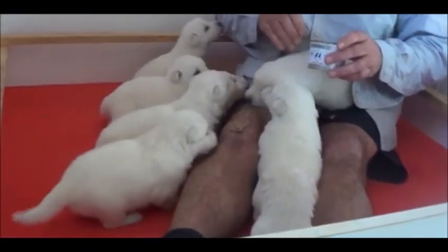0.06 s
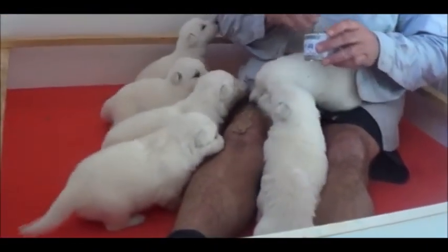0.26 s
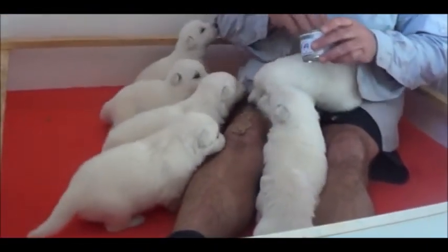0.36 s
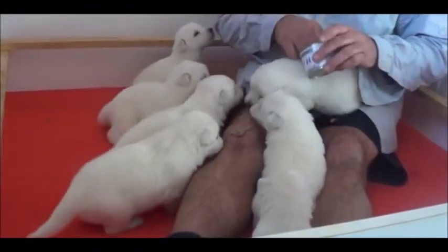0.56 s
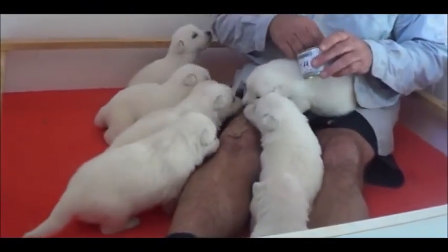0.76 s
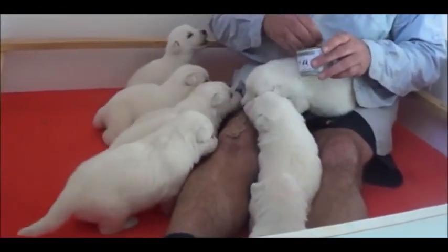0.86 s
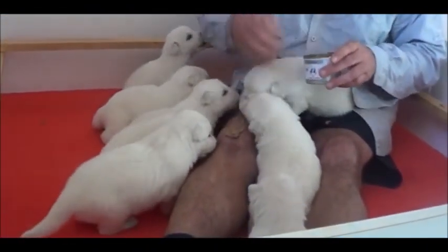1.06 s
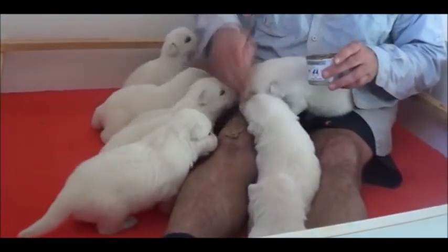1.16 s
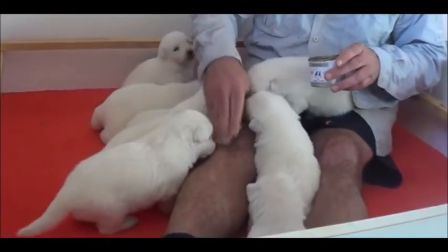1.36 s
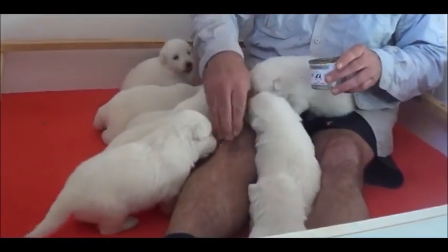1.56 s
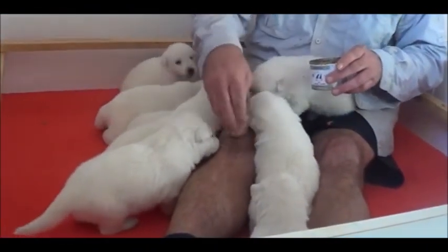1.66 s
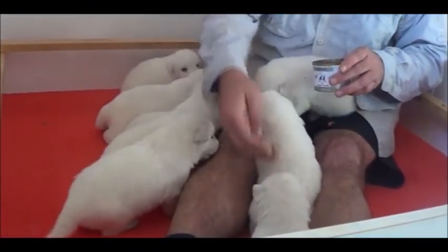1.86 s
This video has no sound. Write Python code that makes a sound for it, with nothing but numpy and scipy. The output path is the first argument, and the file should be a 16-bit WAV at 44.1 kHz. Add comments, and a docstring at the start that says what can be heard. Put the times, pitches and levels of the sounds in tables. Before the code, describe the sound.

Puppies give four high whines and a few short yips in a small room.

```python
"""Puppies beg for food in a small, bare room: four high arched whines, three short, lower yips.
Their vocal folds give near-pure tones; in the whines, overtones and air pass through the throat.
Between them: two soft grunts, fur rustling on cloth, mouth and claw clicks, faint squeaks.
The room rings after every cry, over a quiet hiss and a thin electrical whistle."""
import sys
import numpy as np
from scipy import signal
from scipy.fft import rfft, irfft
from scipy.io import wavfile
from scipy.ndimage import uniform_filter1d

SR = 44100
rng = np.random.default_rng(int(sys.argv[2]) if len(sys.argv) > 2 else 0)


def waveform_to_disk(signal):
    """Save audio, clipped to [-1, 1], as 16-bit WAV at the path in sys.argv[1]."""
    frames = np.transpose(np.atleast_2d(signal))
    scaled = np.clip(frames, -1, 1) * 32767
    samples = np.round(scaled).astype(np.int16)
    wavfile.write(sys.argv[1], SR, samples)


N = 83790

# hiss level: t/s, level/dB
HISS_ENVELOPE = [(0, -45.5), (.75, -46.5), (1.15, -43), (1.45, -43), (1.9, -44.5)]
# hiss spectrum: f/Hz, relative density/dB
HISS_SPECTRUM = [(20, -21), (45, -12), (70, -5.5), (100, -2), (150, -5), (280, -6), (560, -8), (850, 1),
                 (1240, -12), (2060, -4.5), (3500, -9), (4500, -4), (5200, -10), (6300, -8.5),
                 (9800, -18.5), (15500, -21.5)]
# yips: start/s, length/s, top pitch/Hz, share of length before top, fractional pitch fall, level/dB
YIP_EVENTS = [(0.013, .028, 996.6, 0.075, 0.223, -32), (1.553, 0.061, 906.2, 0.42, .22, -31.5),
              (1.825, 0.034, 875, 0.44, 0.258, -33.5)]
# room decay: f/Hz, T60/s
ROOM_DECAY = [(200, .5), (1000, 0.49), (2400, 0.47), (5000, 0.4), (12000, 0.23)]
# room response: f/Hz, gain/dB
ROOM_GAIN = [(200, -8), (1000, 3), (2400, -2.5), (5000, -8.5), (12000, 8)]
# stereo width of hiss, room, rustles and clicks: f/Hz, left-right likeness (1 = mono)
STEREO_LIKENESS = [(100, 0.99), (500, 0.46), (1000, 0.63), (2500, 0.12), (5000, 0.21), (8000, 0.66),
                   (13000, 0.99)]
# clicks: start/s, level before envelope/dB, centre/Hz, width/octaves
CLICK_EVENTS = [(0.065, -38, 2200, 1.6), (0.126, -38, 3000, 3.8), (0.334, -32, 4430, 0.41),
                (.478, -38, 2500, 1.2), (0.568, -36.5, 9000, .5), (.598, -26.5, 4400, 0.68),
                (0.737, -37.5, 616, 0.79), (1.017, -42, 11600, 0.032), (1.04, -30.5, 4300, 0.5),
                (1.421, -42.5, 9100, .5), (1.554, -38.5, 7400, 0.4), (1.611, -39, 11870, 0.018),
                (1.67, -41, 3940, 0.19), (1.755, -40.5, 7300, .5), (1.867, -41.5, 11600, 0.02)]
# one contour per whine: t/s, pitch/Hz, fundamental/dB, even overtone drive/dB, odd overtone drive/dB
WHINE_CONTOURS = [
    [(.213, 1044, -45, -44, -42.5), (.24, 1032, -24.5, -34.5, -42.5), (.255, 1080, -36, -29, -27.5),
     (.268, 1137, -24, -56, -26), (.285, 1107, -25, -29, -52), (.305, 1012, -28.5, -42, -52)],
    [(.476, 1030, -29, -41, -53), (.498, 1042, -36, -30, -36.5), (.52, 1137, -30.5, -25.5, -25),
     (.538, 1234, -22, -34.5, -18), (.556, 1238, -20.5, -26, -39), (.578, 1134, -27.5, -32.5, -46),
     (.61, 1067, -26.5, -38, -43)],
    [(.786, 1074, -57, -45, -45), (.803, 1046, -35, -43, -44), (.826, 1149, -27, -33.5, -24),
     (.848, 1205, -32.5, -37, -21), (.86, 1208, -27.5, -19.5, -19), (.89, 1220, -34, -14, -25.5),
     (.914, 1212, -26.5, -15, -24.5), (.932, 1142, -25.5, -23, -33.5), (.962, 1113, -30, -27.5, -25.5),
     (.99, 1033, -28.5, -38, -45)],
    [(1.176, 1013, -43.5, -42.5, -46), (1.205, 989.4, -31.5, -37.5, -39), (1.23, 1003, -25.5, -38.5, -41),
     (1.262, 1009, -22, -35, -30.5), (1.28, 926, -22.5, -32.5, -33.5), (1.297, 811.4, -31.5, -34.5, -50),
     (1.33, 852, -27.5, -60, -50)],
]
# aim of each whine: tilt/dB per harmonic, left over right/dB, direct gain/dB
WHINE_AIMS = [(0.05, 8, -2), (0.87, 11, -6.5), (0.1, 3.5, 0.5), (-0.08, 5.5, -3)]
# throat response: f/Hz, gain/dB
THROAT_GAIN = [(500, -44), (1600, -9), (2100, -5), (2420, -3), (3000, -9), (3550, -3), (4020, 1.5),
               (4350, -10), (4870, -2.5), (5200, -5.5), (5600, 0.5), (6200, -6.5), (7300, -20.5),
               (8500, -31), (9700, -33.5), (14000, -54)]
# rustles: start/s, length/s, brush level/dB, rub level/dB
RUSTLE_EVENTS = [(0.287, 0.056, -34.5, -42.5), (0.559, 0.066, -37, -50.5), (0.654, .1, -55.5, -51),
                 (0.982, 0.094, -40.5, -48), (1.262, 0.075, -45, -59)]
# bright brush of fur: f/Hz, relative level/dB
BRUSH_SPECTRUM = [(500, 8), (1500, 9), (3000, 11.5), (5000, 17.5), (7000, 3.5), (10000, -1.5), (15000, -31)]
# low rub of fur: f/Hz, relative level/dB
RUB_SPECTRUM = [(30, -26), (120, -12), (280, 13.5), (600, 3.5), (1500, 6.5), (5000, -46)]
# grunts: start/s, length/s, first pitch/Hz, last pitch/Hz, level/dB, tilt/dB per harmonic
GRUNT_EVENTS = [(0.452, 0.033, 206, 173.6, -35.5, -6.5), (.99, 0.1057, 183.1, 239.5, -36, -19)]
# squeaks: start/s, length/s, level/dB
SQUEAK_EVENTS = [(1.327, 0.11, -57), (1.5, 0.1, -60), (1.737, 0.084, -58.5)]


def amp(db):
    return 10 ** (np.asarray(db) / 20)


def unit_rms(x):
    return x / np.sqrt(np.mean(x ** 2) + 1e-20)


def log_interp(points, hz):
    table_hz, value = np.transpose(points)
    return np.interp(np.log(hz + 1), np.log(table_hz + 1), value)


def add(mix, start_s, sound):
    part = mix[..., max(round(start_s * SR), 0):][..., :sound.shape[-1]]
    part += sound[..., :part.shape[-1]]


def bins_hz(size):
    return np.fft.rfftfreq(size, 1 / SR)


def fades(t, fade_s=.0025):
    return np.sin(np.pi / 2 * np.clip(np.minimum(t, t[-1] - t) / fade_s, 0, 1)) ** 2


def stereo_width(spectra, hz):
    """Two independent spectra to left and right: wide in the middle, near mono in lows and highs."""
    likeness = log_interp(STEREO_LIKENESS, hz)
    mid = np.sqrt((1 + likeness) / 2) * spectra[0]
    side = np.sqrt((1 - likeness) / 2) * spectra[1]
    return np.array([mid + side, mid - side])


def noise(spectrum):
    """Shaped stereo noise, unit RMS."""
    hz = bins_hz(N)
    white = stereo_width(rfft(rng.standard_normal((2, N))), hz)
    return unit_rms(irfft(white * amp(log_interp(spectrum, hz)), N))


def waver(size, cutoff_hz, order):
    """Low-passed random drift."""
    rolloff = 1 + (bins_hz(N) / cutoff_hz) ** order
    return unit_rms(irfft(rfft(rng.standard_normal(N)) / rolloff, N))[:size]


def jittered_phase(hz, jitter=.0035):
    """Phase of an unsteady oscillator such as the vocal folds."""
    drift = waver(len(hz), cutoff_hz=238, order=2)
    return 2 * np.pi * np.cumsum(hz * (1 + jitter * drift)) / SR


def hiss(t):
    """Quiet noise floor; the level drifts slowly."""
    return amp(np.interp(t, *np.transpose(HISS_ENVELOPE))) * noise(HISS_SPECTRUM)


def whistle(t, hz=15625, level_db=-67.5):
    """Steady electrical tone."""
    return np.sqrt(2) * amp(level_db) * np.sin(2 * np.pi * hz * t)


def yip(length_s, top_hz, top_share, fall, level_db, second_db=-8.5, tilt_db=-15):
    """Hoarse, closed-mouth cry; the pitch lifts a little, then drops."""
    t = np.arange(0, length_s, 1 / SR)
    past_top = t / length_s - top_share
    sag_before = .12 * (2 * past_top) ** 2
    sag_after = fall * np.sin(np.pi / 2 * past_top / (1 - top_share)) ** 2
    hz = top_hz * (1 - np.where(past_top < 0, sag_before, sag_after))
    phase = jittered_phase(hz, jitter=.02)
    overtones = sum(amp(second_db + tilt_db * (k - 2)) * np.sin(k * phase) for k in range(2, 5))
    return np.sqrt(2) * amp(level_db) * fades(t) * (np.sin(phase) + overtones)


def place(voice, direct_db, pan_db=0, lag_s=.00007):
    """Returns left, right and room feed; sound reaches the right later."""
    delay = np.exp(-2j * np.pi * bins_hz(N) * lag_s)
    right = irfft(rfft(voice, N) * delay, N)[:len(voice)]
    return np.array([voice * amp(direct_db + pan_db / 2), right * amp(direct_db - pan_db / 2), voice])


def room(feed, gap_s=.005):
    """Dense reflections, each band decaying at its own rate."""
    band_hz, t, frames = signal.stft(rng.standard_normal((2, SR)), SR, nperseg=256)
    t60_s = log_interp(ROOM_DECAY, band_hz)[:, None]
    tail = signal.istft(frames * amp(-60 * t / t60_s) / np.sqrt(t60_s), SR, nperseg=256)[1][:, :SR]
    hz = bins_hz(SR)
    spectra = stereo_width(rfft(tail), hz)
    spectra /= np.sqrt(uniform_filter1d(abs(spectra) ** 2, size=120, axis=1))  # flatten
    spectra *= amp(log_interp(ROOM_GAIN, hz))
    response = np.zeros((2, SR))
    add(response, gap_s, irfft(spectra, SR)[:, :SR * 3 // 4])
    return signal.fftconvolve(feed, response, axes=1)[:, :N]


def click(level_db, centre_hz, width_oct, attack_s=.00059, decay_s=.004):
    """Mouth or claw: a tiny noise burst in one band."""
    t, hz = np.arange(2048) / SR, bins_hz(2048)
    band = np.exp(-.5 * (np.log2((hz + 1) / centre_hz) / width_oct) ** 2)
    white = stereo_width(rfft(rng.standard_normal((2, len(t)))), hz)
    burst = unit_rms(irfft(white * band))
    return amp(level_db) * burst * np.minimum(t / attack_s, 1) * np.exp(-t / decay_s)


def whine(contour, tilt_db, air_db=-24.5):
    """Near-pure fold tone with throat-filtered overtones and air; even overtones leap in a squeal."""
    knots_s, *curves = np.transpose(contour)
    t = np.arange(0, knots_s[-1] - knots_s[0], 1 / SR)
    hz, fundamental_db, even_db, odd_db = (
        uniform_filter1d(np.interp(t + knots_s[0], knots_s, curve), size=300) for curve in curves)
    phase = jittered_phase(hz)
    overtones = np.zeros(len(t))
    for k in range(2, 13):
        drive_db = (odd_db if k % 2 else even_db) + tilt_db * (k - 7.5)
        overtones += amp(drive_db + log_interp(THROAT_GAIN, k * hz)) * np.sin(k * phase)
    shimmer = 1 + .088 * waver(len(t), cutoff_hz=300, order=4)
    fundamental = amp(fundamental_db) * shimmer * np.sin(phase)
    air = amp(air_db + (even_db + odd_db) / 2) * noise(THROAT_GAIN)[0, :len(t)]
    air *= 1 + np.cos(phase)  # one puff per cycle
    return np.sqrt(2) * fades(t) * (fundamental + overtones + air)


def rustle(length_s, brush_db, rub_db, grain_db=2.53):
    """Fur on cloth: grainy hiss over a low rub."""
    t = np.arange(0, length_s, 1 / SR)
    grain = amp(grain_db * unit_rms(uniform_filter1d(rng.standard_normal(N), size=120)))
    friction = amp(brush_db) * noise(BRUSH_SPECTRUM) + amp(rub_db) * noise(RUB_SPECTRUM)
    return fades(t, fade_s=.0041) * (grain * friction)[:, :len(t)]


def grunt(length_s, first_hz, last_hz, level_db, tilt_db):
    """Low, muffled, uneven glide of the folds."""
    t = np.arange(0, length_s, 1 / SR)
    phase = jittered_phase(np.linspace(first_hz, last_hz, len(t)), jitter=.081)
    harmonics = sum(amp(tilt_db * k) * np.sin((k + 1) * phase) for k in range(3))
    return np.sqrt(2) * amp(level_db) * fades(t, fade_s=.0041) * harmonics


def squeak(length_s, level_db, first_hz=13800, rise_hz=390):
    """Thin tone that rises and levels off."""
    t = np.arange(0, length_s, 1 / SR)
    phase = jittered_phase(first_hz + rise_hz * np.sin(2 * t / length_s))
    return np.sqrt(2) * amp(level_db) * fades(t, fade_s=.02) * np.sin(phase)


def scene():
    """Puppies a little to the left, small noises near, all in the room."""
    voices, near, t = np.zeros((3, N)), np.zeros((2, N)), np.arange(N) / SR
    for contour, (tilt_db, pan_db, direct_db) in zip(WHINE_CONTOURS, WHINE_AIMS):
        add(voices, contour[0][0], place(whine(contour, tilt_db), direct_db, pan_db))
    for start_s, *settings in YIP_EVENTS:
        add(voices, start_s, place(yip(*settings), direct_db=-3.5))
    for start_s, *settings in GRUNT_EVENTS:
        add(voices, start_s, place(grunt(*settings), direct_db=-6.5))
    for source, events in ((rustle, RUSTLE_EVENTS), (click, CLICK_EVENTS), (squeak, SQUEAK_EVENTS)):
        for start_s, *settings in events:
            add(near, start_s, source(*settings))
    room_feed = voices[2] + amp(-27) * near
    return hiss(t) + whistle(t) + voices[:2] + near + room(room_feed)


def record(dry, cutoff_hz=15900):
    """Steep low-pass."""
    taps = signal.firwin(511, cutoff_hz, window=("kaiser", 9), fs=SR)
    return signal.oaconvolve(dry, taps[None], "same")


dry = scene()
out = record(dry)
waveform_to_disk(out)
```